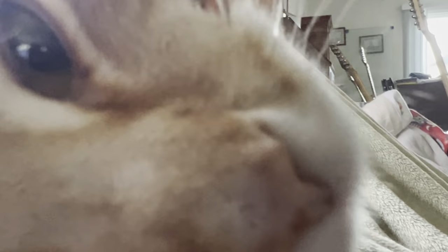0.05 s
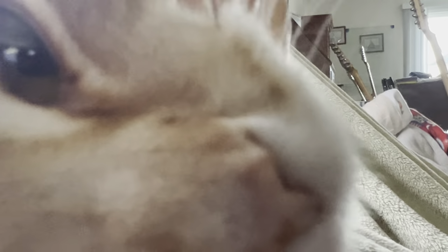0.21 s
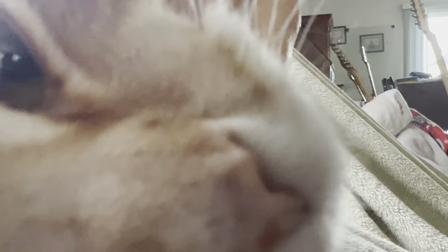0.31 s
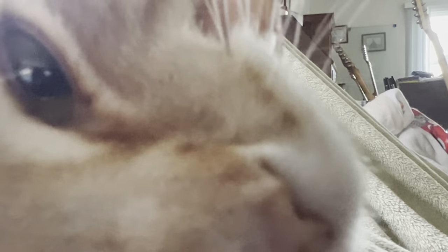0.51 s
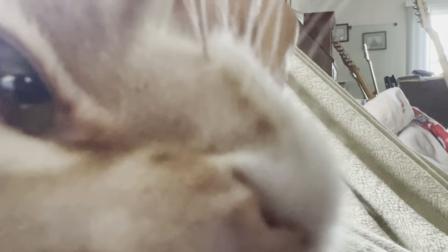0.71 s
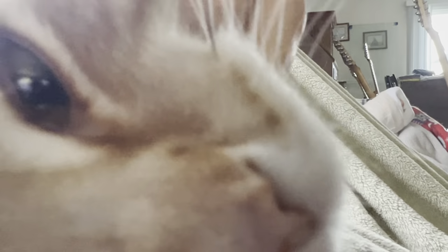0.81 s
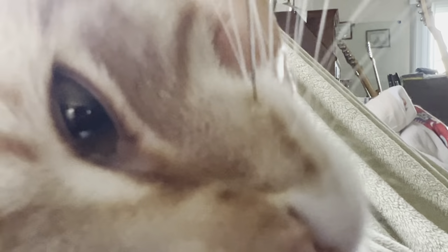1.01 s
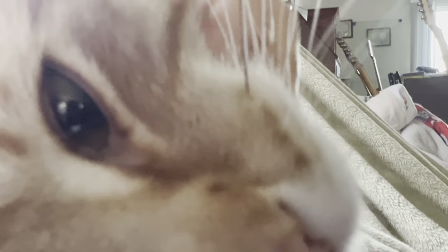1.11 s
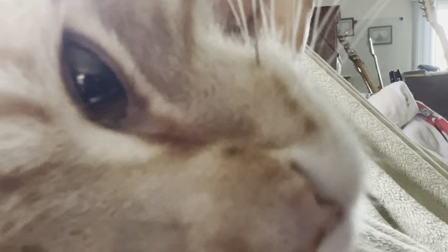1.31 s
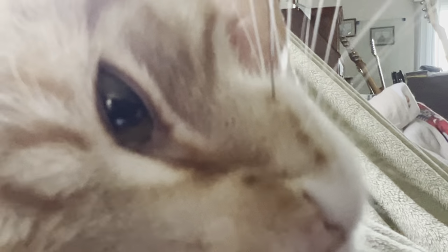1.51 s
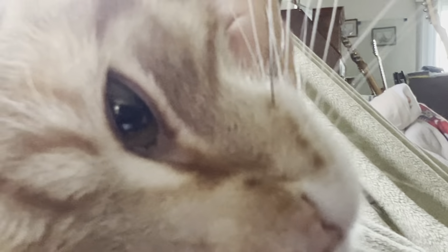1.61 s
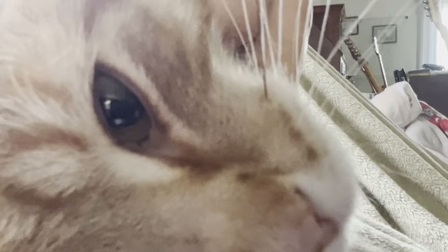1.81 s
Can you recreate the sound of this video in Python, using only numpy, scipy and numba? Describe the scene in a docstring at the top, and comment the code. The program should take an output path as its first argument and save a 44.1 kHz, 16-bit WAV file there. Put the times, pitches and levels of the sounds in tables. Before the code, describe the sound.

A cat purrs right against the microphone in a quiet room: a faint start, a small wet tick and low knock, one loud throaty rattle, then a soft low hum with light sniffs as the next stroke begins.

```python
"""A cat purrs with its nose right at the microphone, in a quiet room.
Its larynx opens about thirty times a second; on the loud stroke each opening lets the folds flap
a few times, ringing throat, mouth and nose and puffing air. On the soft stroke the chest hums and
rumbles. The nose sniffs lightly four times a second; the mouth adds wet ticks and one low knock.
Flaps are uneven clicks through resonators; breath and room are coloured noise; the hum is partials."""
import sys
import numpy as np
from scipy import signal
from scipy.fft import rfft, irfft
from scipy.io import wavfile
from scipy.ndimage import uniform_filter1d
from numba import njit

SR = 44100
rng = np.random.default_rng(int(sys.argv[2]) if len(sys.argv) > 2 else 0)


def materialize(psi):
    """Save the field psi as 16-bit PCM at rate SR to the path in sys.argv[1].

    A 1-D psi becomes a single channel; in a 2-D psi each row is a channel.
    """
    bounded = np.clip(np.atleast_2d(psi).T, -1, 1)
    quanta = np.round(bounded * 32767).astype(np.int16)
    wavfile.write(sys.argv[1], SR, quanta)


N = 83790
T_S = np.arange(N) / SR
F_HZ = np.fft.rfftfreq(N, 1 / SR)

# Still room: f/Hz, density/dB per Hz (relative)
ROOM_SPECTRUM = [(30, -1), (200, 2.5), (800, -2.5), (2000, -16.5), (5000, -31.5), (12000, -43),
                 (16000, -16.5)]
ROOM_DB = -71.5

# Sniffs: start/s, length/s, peak level/dB
SNIFFS = [(-.09, 0.19, -71.5), (0.12, 0.31, -67.5), (0.421, 0.17, -67), (0.619, 0.21, -64),
          (0.872, .16, -66), (1.072, 0.21, -67), (1.342, .19, -70), (1.604, .2, -70.5)]
# Sniff noise: f/Hz, density/dB per Hz (relative)
SNIFF_SPECTRUM = [(900, -10), (1500, -8.5), (2500, -8), (4000, -5), (5500, -8), (7500, -3.5), (9500, -2),
                  (10500, 6), (12500, 2), (14500, 1), (16000, -9.5)]
SNIFF_PEAK_SHARE, SNIFF_CURVE = 0.45, 1.5  # peak position in the sniff; exponent of the arc
# Thin nose whistle as the next stroke begins: t/s, level/dB
WHISTLE_LEVEL = [(1.74, -150), (1.785, -84), (1.82, -80), (1.9, -79.5)]
WHISTLE_HZ, WHISTLE_WIDTH_HZ = 3330, 330

# Small wet ticks of the mouth: t/s, level/dB, f/Hz, width/Hz
TICKS = [(0.168, -59, 2000, 1770), (0.232, -43, 740, 694), (0.668, -56, 1840, 1750)]
TICK_PAN_DB = 9.5
# Low knock as the loud stroke catches
KNOCK_S, KNOCK_DB, KNOCK_HZ, KNOCK_WIDTH_HZ = .2335, -29.5, 155, 190

# Chest hum: t/s, level/dB
HUM_LEVEL = [(0, -72), (.19, -50.5), (.25, -45), (.33, -42), (.52, -40.5), (.6, -49.5), (.7, -62),
             (.76, -48), (.83, -60.5), (1.25, -55), (1.5, -60.5), (1.78, -58), (1.87, -48)]
# Hum partials: multiple of the purr rate, level/dB (relative)
HUM_PARTIALS = [(1, -6.5), (2, 3.5), (3, -12), (4, -11.5)]
CHEST_LAG_S = 0.00067
# Rough rumble of breath in the chest: f/Hz, density/dB per Hz (relative)
RUMBLE_SPECTRUM = [(15, -20), (28, -13), (50, 0), (90, 2.5), (140, -2), (220, -5), (330, -11.5), (500, -23),
                   (800, -30), (1400, -32.5), (2200, -43.5), (4000, -49.5)]
# Rumble: t/s, level/dB
RUMBLE_LEVEL = [(0, -50.5), (.13, -61), (.27, -45), (.55, -42), (.74, -55), (.87, -62), (.95, -56),
                (1.24, -55.5), (1.55, -59.5), (1.74, -59), (1.87, -53.5)]
RUMBLE_THROB_DB, RUMBLE_PAN_DB = 1, 3  # swing either way with each opening; left over right

# Openings of the larynx: t/s, rate/Hz
PURR_RATE = [(0, 33), (.18, 33), (.235, 26), (.265, 31), (.3, 31.7), (.55, 33.4), (.7, 31), (.85, 28.6),
             (1.9, 28.6)]
FIRST_STRONG_OPENING_S = .257
# Force of the flaps: t/s, throat level/dB, mouth and nose level/dB
EFFORT = [(.135, -83, -96), (.157, -61.5, -58), (.222, -71, -55.5), (.25, -37, -43), (.32, -31.5, -45),
          (.48, -33.5, -45), (.57, -37, -47), (.692, -41, -48), (.722, -60, -67), (.77, -89.5, -111),
          (1.79, -78, -84), (1.838, -55.5, -60.5), (1.875, -49, -58)]
# Folds while open: t/s, flap rate/Hz, open share of the larynx cycle
FOLDS = [(.157, 290, .36), (.187, 390, 0.25), (.22, 330, 0.25), (.255, 410, 0.59), (.29, 265, .56),
         (.35, 235, .52), (.42, 215, 0.79), (.5, 197, 0.77), (.565, 250, 0.54), (.6, 210, 0.69),
         (.69, 220, 0.47), (1.835, 505, 0.33), (1.875, 420, 0.29)]
FIRST_FLAP_PERIODS, FLAP_JITTER_PERIODS = .3, 0.051  # delay of the first flap; timing spread
FLAP_SPREAD_DB, OPENING_SHAPE = 2.4, 0.33  # shape: 0 = flat run, 1 = arched
FLAP_LEAD_S = .0028  # the flaps come this long before the swell that they ring
# Throat resonance before its swing: t/s, f/Hz
THROAT_CENTRE = [(.25, 360), (.3, 326), (.5, 313.2), (.69, 317.5), (1.8, 487), (1.875, 380)]
THROAT_SWING, THROAT_SWING_TURN = 0.16, 0.14  # share of f either way; delay in larynx cycles
THROAT_WIDTH_HZ, THROAT_BOTTOM_HZ, THROAT_PAN_DB = 93.2, 120, 2.5
# Closed mouth resonances: f/Hz, width/Hz, level/dB (relative), left over right/dB
MOUTH_RESONANCES = [(735, 188, -5.5, 9.3), (970, 90, -15.5, 3.4), (1150, 287, -11.5, 11)]
MOUTH_TOP_HZ = 1185
# Nose resonances: f/Hz, width/Hz, level/dB (relative), left over right/dB
NOSE_RESONANCES = [(2030, 400, -31.5, 7.5), (3330, 87, -39, 2.4), (4175, 70, -37.5, 4),
                   (7560, 5600, -31.5, 0.33)]
# Air that puffs through with each flap: f/Hz, density/dB per Hz (relative)
PUFF_SPECTRUM = [(500, -5), (1600, -9), (2080, 8.5), (2750, 5.5), (3350, 13.5), (3750, 11), (4200, 11),
                 (5000, 6.5), (7800, 3.5), (10000, -66), (16000, 1)]
PUFF_DB, PUFF_DECAY_S, PUFF_PAN_DB = -29, 0.00088, 4.5  # level is relative to mouth effort
PUFF_SPREAD_DB, PUFF_STEADY = 3, .5  # scatter of the puffs; leak between flaps, against the puffs
EVEN_S = .034  # averaging window, about one opening

# The two microphone ports: f/Hz, phase by which left leads/rad
PORT_PHASE = [(0, 0), (40, .24), (200, .36), (600, .46), (1100, .3), (2100, -.18), (3300, .62), (4500, .55),
              (5700, 0), (7300, -.2), (8300, -1.0), (9470, -2.6), (10100, -3.14), (10900, -3.6),
              (12400, -5.6), (14100, -6.6), (15200, -8.2)]
LOW_CUT_HZ, CUTOFF_HZ = 14.8, 15700


def from_db(db):
    """Amplitude for a level in dB."""
    return 10 ** (np.asarray(db) / 20)


def rms_one(x):
    """Scale to rms 1 over all channels."""
    return x / np.sqrt(np.mean(x ** 2) + 1e-20)


def in_time(rows, t_s=T_S):
    """Columns of a breakpoint table, interpolated at t_s."""
    at_s, *columns = np.transpose(rows)
    return [np.interp(t_s, at_s, column) for column in columns]


def pan(db):
    """Left and right gains for a level difference, left over right."""
    return from_db(np.array([[db], [-db]]) / 2)


def noise(spectrum, apart):
    """Coloured stereo noise, rms 1; apart sizes the part that the channels do not share."""
    hz, db = np.transpose(spectrum)
    colour = from_db(np.interp(np.log(F_HZ + 1), np.log(hz), db))
    mid, side = irfft(rfft(rng.standard_normal((2, N))) * colour, N)
    return rms_one(mid + apart * side * np.array([[1], [-1]]))


def resonate(x, hz, width_hz):
    """Two-pole resonance applied twice, for steep skirts."""
    r = np.exp(-np.pi * width_hz / SR)
    gain = (1 - r * r) / 2
    section = [gain, 0, -gain, 1, -2 * r * np.cos(2 * np.pi * hz / SR), r * r]
    return signal.sosfilt([section, section], x + 1e-18)


@njit
def gliding_ring(x, turn, r):
    """Complex one-pole resonator whose pitch (turn, rad per sample) moves."""
    out, state = np.zeros(len(x)), 0j
    for i in range(len(x)):
        state = state * r * np.exp(1j * turn[i]) + x[i]
        out[i] = state.real
    return out


def blip(at_s, hz, width_hz):
    """Band-passed impulse: one short ring of peak height 1."""
    top_hz = np.hypot(hz, width_hz / 2) + width_hz / 2
    band = signal.butter(3, [top_hz - width_hz, top_hz], "band", fs=SR, output="sos")
    impulse = np.arange(N) == int(at_s * SR)
    ring = signal.sosfilt(band, impulse + 1e-18)
    return ring / np.abs(ring).max()


def evened(x):
    """Hold the level steady from one opening to the next, by dividing out the running rms."""
    window = int(EVEN_S * SR)
    power = uniform_filter1d(uniform_filter1d(x * x, window), window)
    return x / np.sqrt(np.abs(power) + np.mean(x * x) * 1e-3)


def purr_cycles():
    """Running count of larynx cycles; whole numbers are the middles of the openings."""
    turns = np.cumsum(in_time(PURR_RATE)[0]) / SR
    return turns - np.interp(FIRST_STRONG_OPENING_S, T_S, turns)


def room():
    """Steady room noise, wide between the channels."""
    return from_db(ROOM_DB) * noise(ROOM_SPECTRUM, apart=1.0)


def sniffs():
    """Air noise in the nostrils swells and fades with the flow of each sniff."""
    flow = 0
    for start_s, length_s, db in SNIFFS:
        peak_s = start_s + SNIFF_PEAK_SHARE * length_s
        arc = np.interp(T_S, [start_s, peak_s, start_s + length_s], [0, np.pi / 2, np.pi])
        flow = flow + from_db(db) * np.abs(np.sin(arc)) ** SNIFF_CURVE
    return flow * noise(SNIFF_SPECTRUM, apart=0.067) * pan(db=0.6)


def nose_whistle(cycles):
    """Narrow resonance on noise, loudest midway between openings."""
    ringing = rms_one(resonate(rng.standard_normal(N), WHISTLE_HZ, WHISTLE_WIDTH_HZ))
    between_openings = np.sin(np.pi * cycles) ** 2
    return from_db(in_time(WHISTLE_LEVEL)[0]) * ringing * between_openings


def mouth_ticks():
    """Wet ticks: short band-limited rings."""
    ticks = sum(from_db(db) * blip(at_s, hz, width_hz) for at_s, db, hz, width_hz in TICKS)
    return ticks * pan(TICK_PAN_DB)


def knock():
    """Dull low ring at the start of the loud stroke, inverted."""
    return -from_db(KNOCK_DB) * blip(KNOCK_S, KNOCK_HZ, KNOCK_WIDTH_HZ)


def chest(cycles):
    """The body hums on low multiples of the purr rate, over a rumble that throbs with it."""
    turn = 2 * np.pi * np.interp(T_S - CHEST_LAG_S, T_S, cycles)
    hum = sum(from_db(db) * np.cos(round(k) * turn) for k, db in HUM_PARTIALS)
    throb = from_db(RUMBLE_THROB_DB * np.cos(turn))
    rumble = rms_one(noise(RUMBLE_SPECTRUM, apart=0.051) * throb) * pan(RUMBLE_PAN_DB)
    hum_gain = from_db(in_time(HUM_LEVEL)[0])
    rumble_gain = from_db(in_time(RUMBLE_LEVEL)[0])
    return hum_gain * rms_one(hum) + rumble_gain * rumble


def flaps(cycles):
    """Each opening releases a short, slightly uneven run of clicks that swells and fades."""
    clicks, steps = np.zeros(N), np.arange(12)
    openings = np.arange(np.ceil(cycles[0]), cycles[-1])
    for centre_s in np.interp(openings, cycles, T_S):
        flap_hz, open_share = in_time(FOLDS, centre_s)
        open_s = open_share / in_time(PURR_RATE, centre_s)[0]
        jitter = FLAP_JITTER_PERIODS * rng.standard_normal(len(steps))
        delay_s = (steps + FIRST_FLAP_PERIODS + jitter) / flap_hz
        swell = np.abs(np.sin(np.pi * delay_s / open_s)) ** OPENING_SHAPE
        size = swell * from_db(FLAP_SPREAD_DB * rng.standard_normal(len(steps)))
        at = ((centre_s - open_s / 2 + delay_s - FLAP_LEAD_S) * SR).astype(int)
        keep = (delay_s < open_s) & (at >= 0) & (at < N)
        clicks[at[keep]] -= size[keep]
    return clicks


def puffs(clicks):
    """Air hisses through the nose with each flap, some puffs much stronger than others."""
    sizes = np.abs(clicks) * from_db(PUFF_SPREAD_DB * rng.standard_normal(N))
    decay = np.exp(-1 / (PUFF_DECAY_S * SR))
    gate = evened(signal.lfilter([1], [1, -decay], sizes + 1e-18))
    return rms_one(gate + PUFF_STEADY) * noise(PUFF_SPECTRUM, apart=.4) * pan(PUFF_PAN_DB)


def tract(clicks, resonances, level_db):
    """The flaps ring a set of parallel resonances of alternating sign."""
    out = 0
    for k, (hz, width_hz, db, pan_db) in enumerate(resonances):
        ringing = evened(resonate(clicks, hz, width_hz))
        out = out + (-1) ** k * from_db(db) * pan(pan_db) * ringing
    return from_db(level_db) * out


def throat(clicks, cycles, level_db):
    """The lowest resonance, its pitch swinging up and down once per larynx cycle."""
    swing = THROAT_SWING * np.sin(2 * np.pi * (cycles - THROAT_SWING_TURN))
    hz = in_time(THROAT_CENTRE)[0] * (1 + swing)
    turn, r = 2 * np.pi * hz / SR, np.exp(-np.pi * THROAT_WIDTH_HZ / SR)
    ringing = gliding_ring(gliding_ring(clicks, turn, r), turn, r)
    high_pass = signal.butter(2, THROAT_BOTTOM_HZ, "high", fs=SR, output="sos")
    ringing = signal.sosfilt(high_pass, ringing)
    return from_db(level_db) * evened(ringing) * pan(THROAT_PAN_DB)


def larynx(cycles):
    """Flaps through throat, closed mouth and nose, each with a puff of air."""
    clicks = flaps(cycles)
    throat_db, mouth_db = in_time(EFFORT)
    body = throat(clicks, cycles, throat_db) + tract(clicks, MOUTH_RESONANCES, mouth_db)
    muffled = signal.sosfilt(signal.butter(14, MOUTH_TOP_HZ, fs=SR, output="sos"), body)
    nasal = tract(clicks, NOSE_RESONANCES, mouth_db)
    return muffled + nasal + from_db(mouth_db + PUFF_DB) * puffs(clicks)


def scene():
    """The cat, close up, over the still room."""
    cycles = purr_cycles()
    background = room() + sniffs() + nose_whistle(cycles) + mouth_ticks() + knock()
    return background + chest(cycles) + larynx(cycles)


def record(dry):
    """The two ports differ in phase; the deepest bass and the top are cut."""
    lead = np.interp(F_HZ, *np.transpose(PORT_PHASE))
    phase = np.exp(1j * lead * np.array([[.5], [-.5]]))
    low_cut = 1 / np.sqrt(1 + (LOW_CUT_HZ / (F_HZ + 1)) ** 10)
    ports = irfft(rfft(dry) * low_cut * phase, N)
    return signal.sosfilt(signal.ellip(12, .1, 80, CUTOFF_HZ, fs=SR, output="sos"), ports)


dry = scene()
out = record(dry)
materialize(out)
```